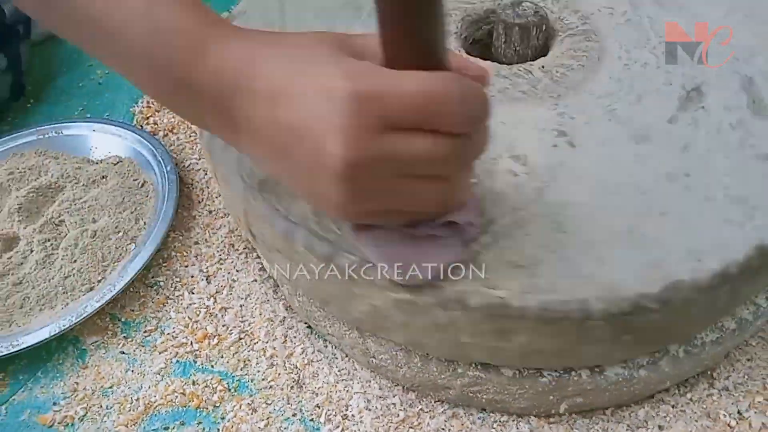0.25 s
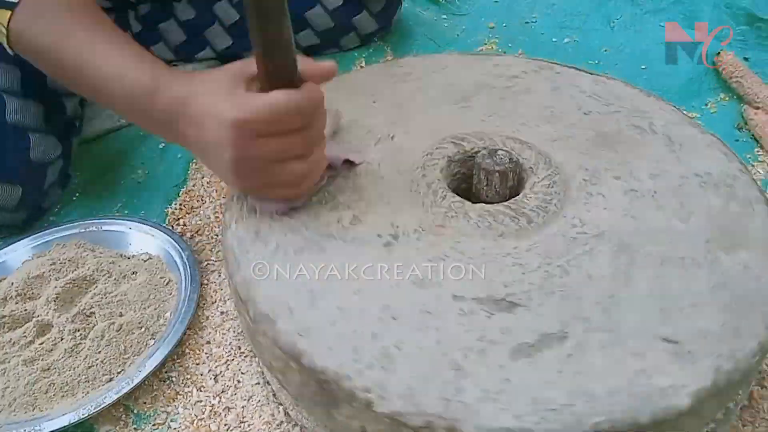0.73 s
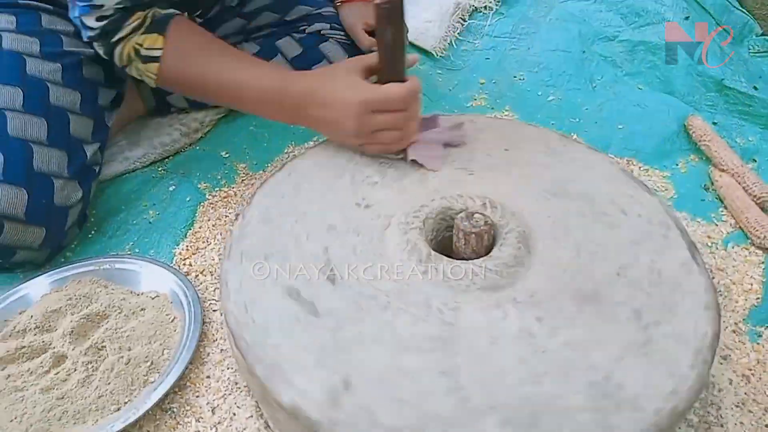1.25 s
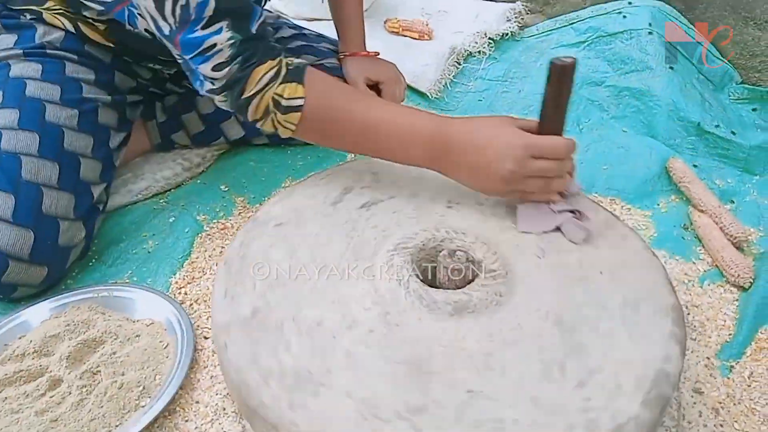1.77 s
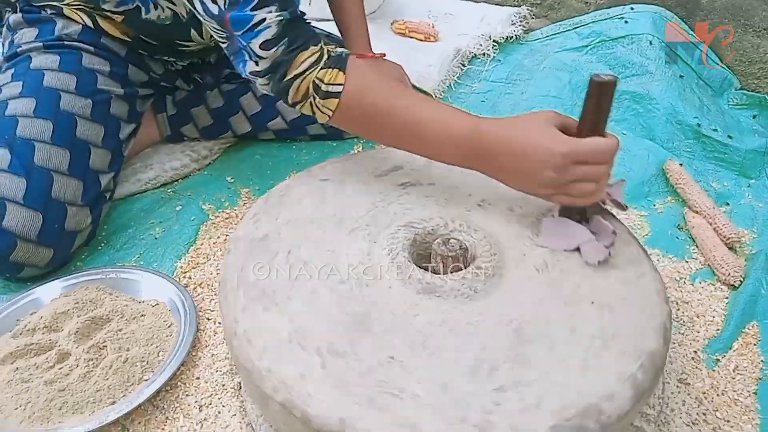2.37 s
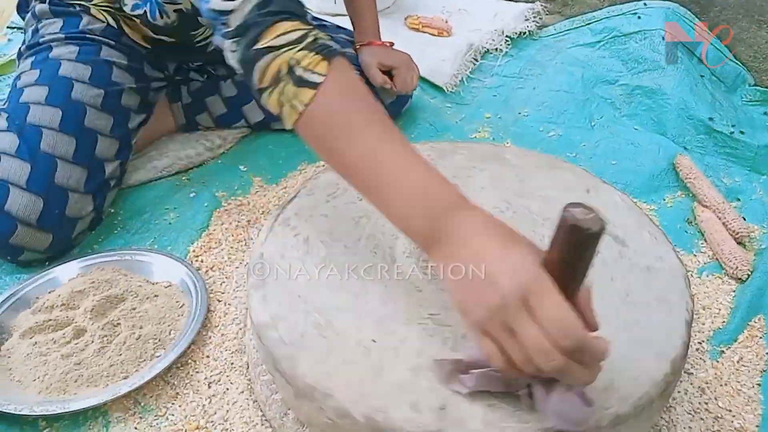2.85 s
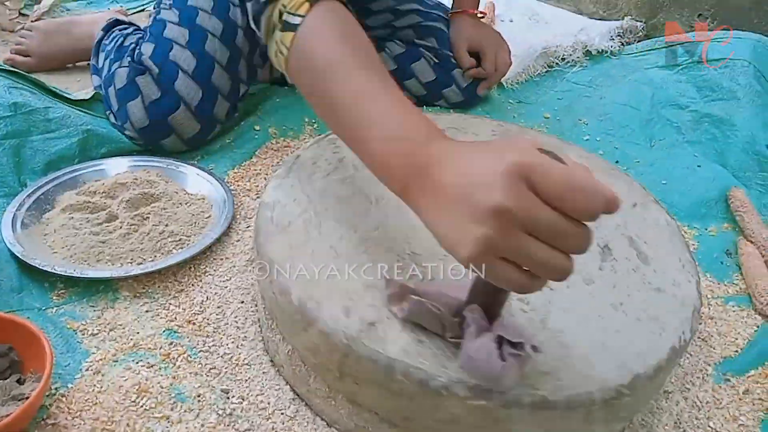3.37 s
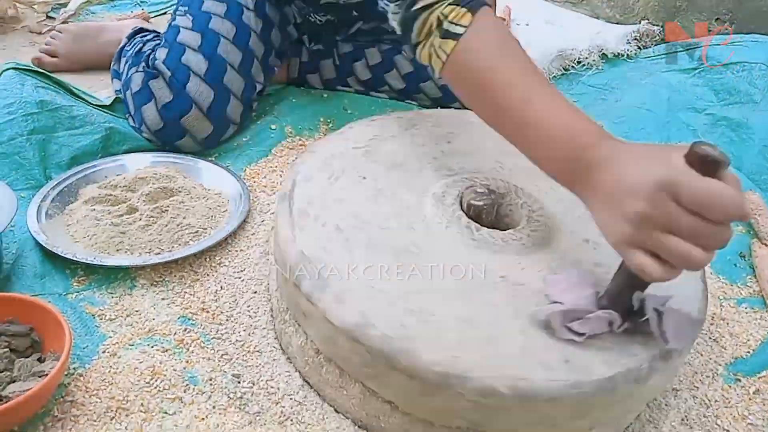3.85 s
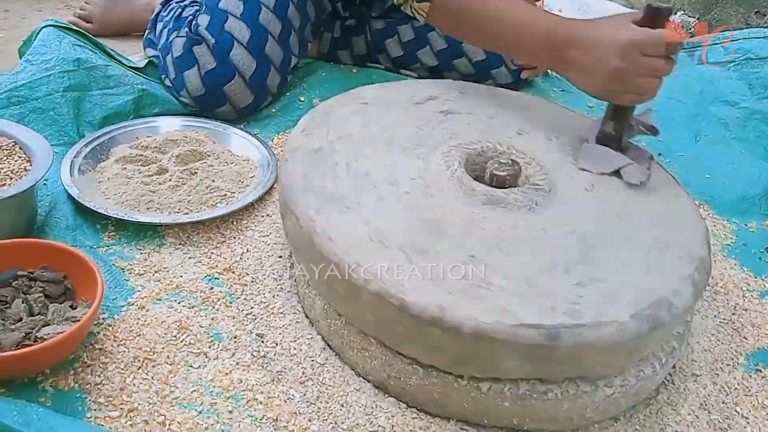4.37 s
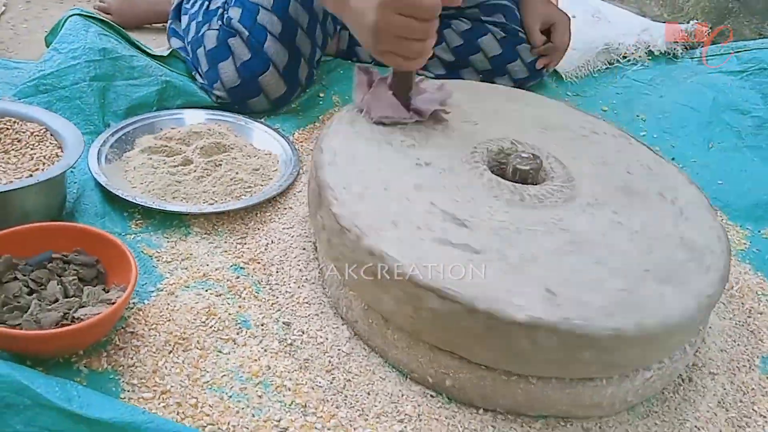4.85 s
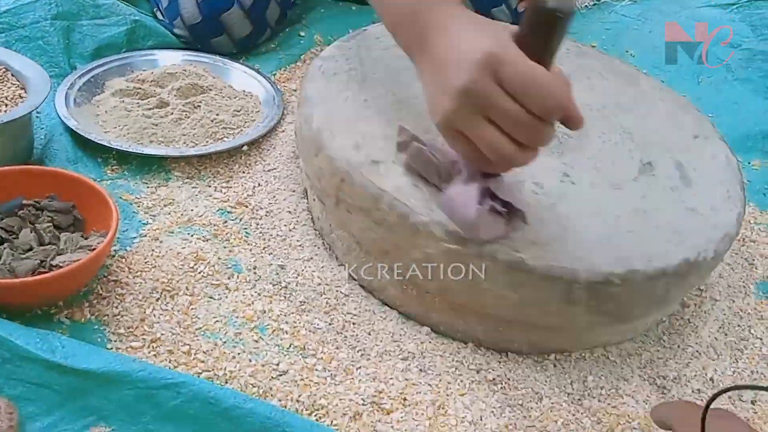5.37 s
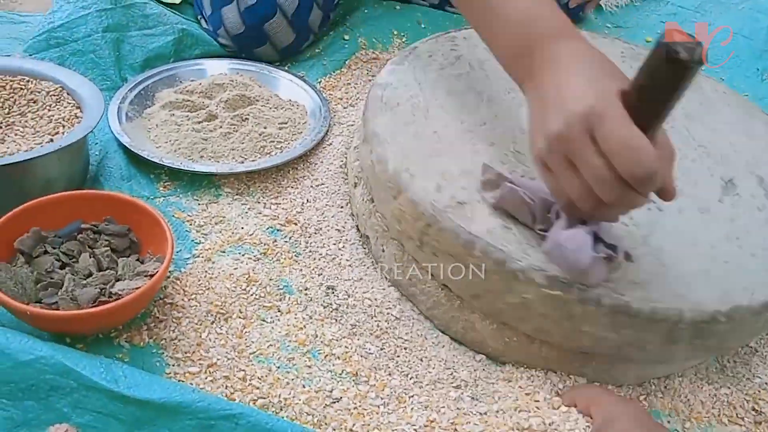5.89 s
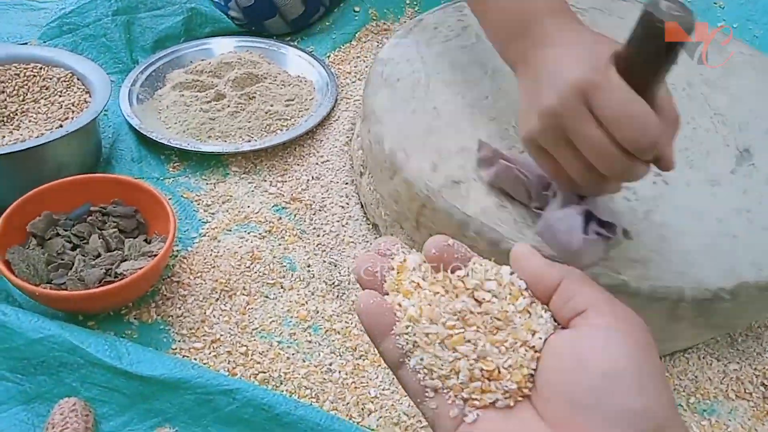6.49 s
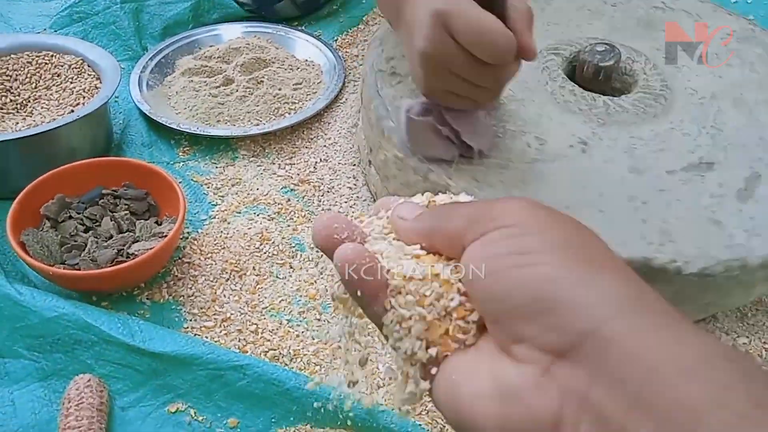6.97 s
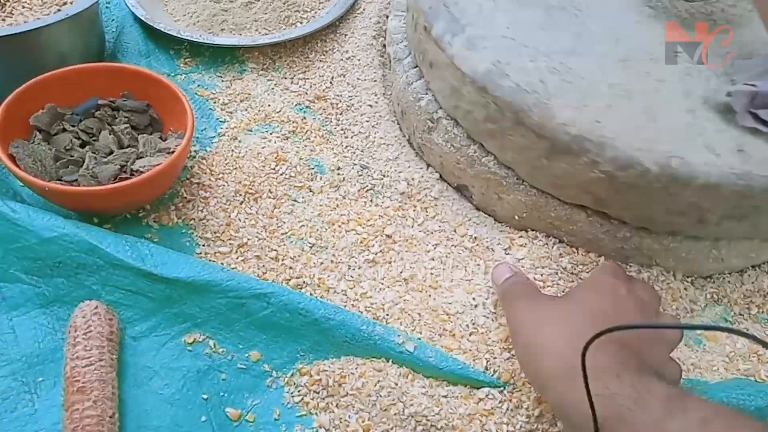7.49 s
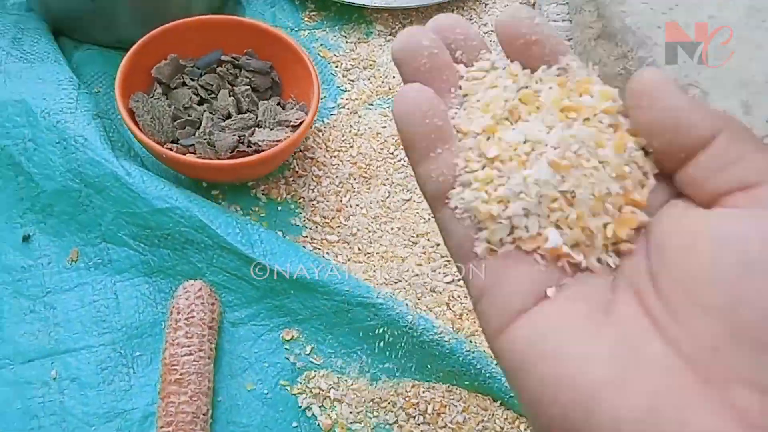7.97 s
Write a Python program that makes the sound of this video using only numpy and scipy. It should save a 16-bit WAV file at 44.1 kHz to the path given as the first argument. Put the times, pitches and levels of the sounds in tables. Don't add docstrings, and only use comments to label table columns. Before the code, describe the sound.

Outdoors, close to a small phone microphone with little deep bass, a heavy stone is already turning on its bed stone. From 0 to 3.1 s the grind is a dense, uneven rumble of cracking kernels with coarse scraping and a clear thin stony ring around 1.4 kHz, swelling and easing with each turn of about 0.7 s. Small jolts and faint dry husk crackles poke through. At 3.08 s the sound cuts to near silence, returning quickly by 3.28 s with a bright snap and knock. Now further off, the ring is weaker and low ground thuds are stronger. Jolts cluster from 3.4 to 4.2 s. Brief rubbing groans appear from 4.4 s, with small snaps around 5.3 to 5.6 s. From 5.8 s the grinding bears down harder, with lumps giving way around 6, 7.2 and 7.4 s, and more snaps, crackles and gritty hiss near 8 s; it is still grinding at the end.

```python
import sys
import numpy as np
from scipy import signal
from scipy.fft import rfft, irfft
from scipy.io import wavfile
from scipy.ndimage import uniform_filter1d, minimum_filter1d

SR = 44100
rng = np.random.default_rng(int(sys.argv[2]) if len(sys.argv) > 2 else 0)


def bounce(signal):
    frames = np.transpose(np.atleast_2d(signal))
    limited = np.clip(frames, -1, 1)
    pcm = np.round(limited * 32767).astype(np.int16)
    wavfile.write(sys.argv[1], SR, pcm)


def field_ratio(decibels):
    return 10 ** (np.asarray(decibels, dtype=float) / 20)


N = 363384

CUT_S = 3.0835
BASS_CUT_HZ, LIMIT = 46, 0.85
SOFT_HZ = 5360
BED_SPLIT_HZ = 640
RUB_WIDTH, RUB_ROUGH_DB = 0.2, 3.5
KNOCK_DB = 27

# (time [s], level [dB])
FADE_IN = [(3.084, -34), (3.091, -56), (3.1, -63), (3.125, -56), (3.18, -47), (3.22, -28), (3.25, -5.5),
           (3.272, -1.5), (3.29, 3.5)]
PLACE_DB = [
    -4,
    -8,
]

# (time [s], unevenness of the push [times the usual])
HANDLE_TURNS = [
    [(-0.141, 0.25), (0.21, 0.54), (0.908, 0.51), (1.543, 0.88), (2.11, 0.85), (2.865, 0.86), (3.601, 0.83)],
    [(2.652, 0.68), (4.095, 1.04), (5.035, 0.95), (5.894, 0.56), (6.668, 0.85), (7.423, 0.48), (8.04, 1.67),
     (9.38, 1.15)],
]
# (time [s], load on the stones [dB], seating of the runner [dB])
EFFORT = [(0, 0.5, 2.5), (0.75, 1.2, 0.7), (1.5, 0.93, -1.5), (2.2, -0.36, 1.1), (2.65, -0.7, 0.5),
          (3.08, -1, 1), (3.3, -7, 4), (3.7, -2, -0.5), (4.1, -1, -0.7), (4.35, 0.5, 2), (4.8, -0.5, 0.3),
          (5.2, 1.1, 2.1), (5.5, 1, -4.5), (5.8, 4, 4), (6.3, 2.5, 0.5), (6.9, 3.5, -4.0), (7.5, 3, -0.1),
          (8.24, 3.5, 0.4)]
# (level [dB], share of load [dB/dB],
# share of seating [dB/dB], once-a-turn swing [dB], its lag [turns], twice-a-turn swing [dB], its lag [turns])
NEAR_LAYERS = [
    (-20.5, 1.0, 0.49, 2, 0.39, 1.5, -0.075),
    (-23, 2.4, -0.32, 3.5, 0.42, 1.95, -0.16),
    (-31, 1.35, 0.59, 3, 0.351, 1.6, 0.055),
    (-18.5, 0.54, -0.3, 2.4, 0.36, 1.0, 0.023),
    (-34.5, 0.04, -0.19, 7.5, 0.22, 2.4, 0.022),
    (-36, 1.3, -1.1, 4, 0.23, -0.45, -0.22),
    (-56.5, 1.49, -0.31, 0.7, 0.31, 0.2, -0.028),
    (-71.0, 1.43, -0.07, 0, -0.412, 0.2, 0.062),
]
FAR_LAYERS = [
    (-19, 0.9, 0.11, 1.1, -0.22, 1.4, -0.028),
    (-23, 1.1, -0.34, 1.9, -0.048, 2.9, -0.036),
    (-24.4, 0.56, -0.16, 1.5, -0.41, 2.1, 0.016),
    (-24.5, 1.06, 0.05, 1.8, -0.0077, 0.26, 0.25),
    (-31.5, 0.5, 0.93, 1.3, 0.0, 3.2, -0.045),
    (-34, 0.82, 0.25, 2.7, -0.059, 1.7, -0.009),
    (-56, -0.49, 0.36, 1.8, 0.061, 1.4, -0.077),
    (-72, 1, -0.05, 0.9, 0.065, 0.9, -0.09),
]

# (time [s], extra force [times the steady grind])
JOLTS = [(0.271, 1.2), (.375, 0.44), (.615, 1.2), (1.08, 0.57), (1.145, 1.1), (1.167, 0.48), (1.226, 1),
         (1.717, 0.99), (2.297, 1.1), (3.393, 1.1), (3.5, 1.2), (3.604, 1), (3.701, 1.6), (3.851, 0.72),
         (4.023, 1.7), (4.144, 1.5), (4.819, 0.65), (5.305, .7), (5.494, 0.48), (5.547, 1), (5.96, 1.7),
         (6.181, 1.4), (6.528, 1), (6.854, 0.64), (7.0, 0.39), (7.206, 1.7), (7.319, 1.5), (7.432, 1.4),
         (7.619, 0.51), (7.95, 1)]
# (frequency [Hz], level [dB per Hz])
BED = [
    [(140, -43), (240, -20), (268, -5), (302, -7), (377, 0.5), (450, -6), (609, 0.5), (766, -2.5),
     (867, -4), (996, -15.5), (1150, -10), (1500, -45.5), (2530, -120)],
    [(140, -35.5), (240, -21.5), (281, -13.5), (344, -4.5), (411, -12), (494, -4.5), (601, 2), (663, -3.5),
     (823, -2.5), (932, -15), (1150, -10), (1500, -52.5), (2530, -120)],
]
# (frequency [Hz], level [dB per Hz])
THUD = [(25, -52), (45, -41.5), (78, -5), (120, 0.5), (147, 3.5), (180, 0), (260, -5), (340, -34),
        (570, -85)]

# (frequency [Hz], width [Hz], near level [dB], far level [dB])
FIRST_RING = [(1359.5, 17.5, 1.5, -1.5), (1378.2, 15.3, 0, -1)]
SECOND_RING = [(1985, 18, 0, -4), (2014, 28, -1, -3)]
UPPER_RINGS = [(3130, 240, -12, -8.5), (2915, 77, -2.5, -1.5), (2988, 51, -4.5, -2), (3120, 31, 5, 4.5),
               (3151, 26, -3, 1)]
THIN_RINGS = [(3910, 120, -10, -5), (4240, 100, -14, -8), (4410, 26, -1, 4.5), (4850, 69, -4, -8.5),
              (5090, 40, -4.5, -9), (5130, 24, -10, -6)]
# (frequency [Hz], level [dB per Hz])
SCRAPE = [
    [(900, -15), (1200, -16.5), (1600, -16.5), (1850, -3), (2300, -11), (2800, -12), (3500, -20.5),
     (4500, -30.5), (5200, -41.5), (5700, -46), (7000, -55), (9000, -74.5)],
    [(900, -13.5), (1200, 9.5), (1600, -20.5), (1850, -17.5), (2300, -13.5), (2800, -5), (3500, -9),
     (4500, -15), (5200, -24.5), (5700, -50.5), (7000, -57.5), (9000, -79)],
]
SCRAPE_DB = [
    -11.5,
    -13,
]

# (time [s], frequency [Hz], length [s], level [dB])
RUBS = [(4.42, 874, 0.11, -29), (5.044, 3370, 0.022, -38.5), (5.34, 3700, 0.044, -44),
        (5.4, 866, 0.074, -25.5), (5.569, 1375, 0.037, -25.5), (4.504, 270, 0.1, -32.5),
        (5.382, 270, .08, -31), (6.17, 603, 0.059, -21.5), (5.826, 699, 0.08, -22.5),
        (6.61, 598, 0.12, -22), (7.364, 623, .08, -22.5), (7.68, 910, 0.077, -28.5),
        (8.043, 640, .08, -25.5)]

# (frequency [Hz], level [dB per Hz])
GRIT = [(4500, -16), (5600, -10.5), (6300, 4), (7300, 2), (8200, -9.5), (9300, -20.5), (11000, -48)]
# (frequency [Hz], width [Hz], near level [dB], far level [dB])
GRIT_RINGS = [(6080, 90, 1, 4), (6600, 160, -7.5, -5.5), (7620, 39, 1, -3.5)]
# (frequency [Hz], level [dB per Hz])
DUST = [
    [(7000, -23), (8600, 1.5), (10500, -2.5), (11500, -1.5), (13300, 1), (15500, -2)],
    [(7000, -22.5), (9300, -4), (10500, -5), (11500, -2), (13300, 0.5), (15500, -1.5)],
]
# (time [s], level [dB])
COARSE = [(3.08, 0.5), (3.3, -5), (3.95, 1), (4.4, 1), (5.2, 2), (5.65, -0.5), (7.7, 1.5), (7.95, 2.5),
          (8.24, 0.5)]
COARSE_SHARE = [
    1.0,
    .6,
]

# (time [s], ping peak [dB], 12 kHz crack [dB], knock in the stone [dB])
SNAPS = [(3.278, -30, -43, -18.5), (3.614, -45, -66, -37), (4.34, -36, -56, -31),
         (5.3514, -36.5, -55.5, -33), (5.5034, -48, -65, -42), (5.6194, -48.5, -51.5, -33),
         (6.9163, -47, -59.5, -33), (7.0454, -40.5, -50.5, -46), (7.897, -32, -60, -24),
         (7.9698, -40.5, -58, -36), (8.0679, -41, -60, -40), (8.0961, -37.5, -65, -39)]
# (time [s], 12 kHz peak [dB], 7 kHz level [dB])
CRACKLES = [(0.21, -40, -39), (0.4397, -50, -52), (0.6728, -52, -60), (0.803, -49.5, -66),
            (0.893, -58, -43), (0.9692, -56, -48.5), (1.3456, -49.5, -53), (1.3717, -53.5, -53),
            (1.548, -51.5, -60), (1.7473, -48, -63), (1.783, -57, -50), (1.9953, -49.5, -50),
            (2.4098, -51, -65), (3.981, -49.5, -38), (4.0524, -50.5, -51), (4.368, -49.5, -48),
            (4.47, -51.5, -52), (5.052, -55, -52), (5.3258, -56, -44.5), (5.7757, -53.5, -49),
            (6.003, -49.5, -53), (6.318, -44, -51.5), (6.3788, -46.5, -57), (6.8718, -49.5, -55.5),
            (6.9041, -57, -56), (7.254, -52.5, -51), (7.606, -50, -47), (7.785, -56, -45),
            (7.952, -46, -49.5), (7.966, -51, -50)]


def grinding(place, layers_db):
    shudder = jolts() * field_ratio(1.1 * np.tanh(walk(18)) + 1.6 * np.tanh(walk(45)))
    rim = crushing(shudder)
    eye = crushing(shudder)
    times, extra = np.transpose(JOLTS)
    blows = clicks(times + 0.001, KNOCK_DB + 20 * np.log10(extra))
    lower = bed(rim + blows, eye, place, *layers_db[:2])
    upper = runner(rim, eye, place, *layers_db[2:5])
    return lower + upper + grit(shudder, place, *layers_db[5:])


def crushing(shudder):
    breaks = cracks(share=0.025, spread_db=3.0, most_db=14.5)
    return shudder * field_ratio(0.43 * walk(30)) * (breaks + 0.56 * rng.standard_normal(N))


def jolts():
    times, extra = np.transpose(JOLTS)
    at = np.zeros(N)
    at[(times * SR).astype(int)] = extra
    before = 800
    t = np.arange(-before, 2000) / SR
    stall = -0.33 * np.exp(np.minimum(t, 0) / 0.05)
    release = np.exp(-np.maximum(t, 0) / 0.0046)
    swells = signal.fftconvolve(at, np.where(t < 0, stall, release))[before:before + N]
    return np.maximum(1 + swells, 0.2)


def bed(rim, eye, place, upper_db, thud_db):
    rumble = np.choose(place, [colour(rim + 0.43 * eye, table) for table in BED])
    low, high = (steady(signal.sosfiltfilt(signal.butter(3, BED_SPLIT_HZ, kind, fs=SR, output="sos"), rumble))
                 for kind in ("low", "high"))
    thud = steady(colour((rim - 0.63 * eye) * field_ratio(3.1 * walk(10)), THUD))
    return low + field_ratio(0.91 * (upper_db + 2.5) - 5.5) * high + field_ratio(thud_db + 0.97) * thud


def runner(rim, eye, place, first_db, second_db, upper_db):
    push = soften(rim)
    scrape = np.choose(place, [steady(colour(eye, table)) for table in SCRAPE])
    scrape = scrape + field_ratio(-19.0) * stone(push, THIN_RINGS, place, wander_db=4.5)
    first = field_ratio(first_db + 2.06) * stone(push, FIRST_RING, place, wander_db=6.0)
    second = field_ratio(1.14 * (second_db + 16) - 14.5) * stone(push, SECOND_RING, place, wander_db=6.0)
    upper = field_ratio(upper_db + 1.27) * stone(push, UPPER_RINGS, place, wander_db=2.5)
    scrape_gain = field_ratio(np.choose(place, SCRAPE_DB) + 0.3 * (upper_db + 12))
    return first - second + upper + scrape_gain * scrape


def stone(force, modes, place, wander_db):
    total = np.zeros(N)
    for k, (hz, width, *db) in enumerate(modes):
        sign = (-1) ** (k // 2)
        drive = force * field_ratio(wander_db * walk(9))
        total += sign * field_ratio(np.choose(place, db)) * ring(drive, hz, width)
    return steady(total)


def turning(t, turns, layers):
    times, uneven = np.transpose(turns)
    turn = np.interp(t, times, np.arange(len(times)))
    uneven = np.interp(t, times, uneven)
    times, load_db, seat_db = np.transpose(EFFORT)
    load_db = np.interp(t, times, load_db)
    seat_db = np.interp(t, times, seat_db)
    levels_db = []
    for db, by_load, by_seat, once_db, once_lag, twice_db, twice_lag in layers:
        once = once_db * np.cos(2 * np.pi * (turn - once_lag))
        twice = twice_db * np.cos(4 * np.pi * (turn - twice_lag))
        levels_db.append(db + by_load * load_db + by_seat * seat_db + uneven * (once + twice))
    return np.array(levels_db)


def rubs():
    out = np.zeros(N)
    drag = field_ratio(RUB_ROUGH_DB * walk(40)) * rng.standard_normal(N)
    for time, hz, length, db in RUBS:
        at = np.arange(int((time - 0.4) * SR), min(int((time + 0.4) * SR), N))
        hum = ring(ring(drag[at], hz, RUB_WIDTH * hz), hz, RUB_WIDTH * hz)
        swell = np.exp(-0.5 * ((at / SR - time) / np.clip(length, 0.01, 0.13)) ** 2)
        out[at] += level(hum, db) * swell
    return out


def snaps():
    times, ping_db, crack_db, knock_db = np.transpose(SNAPS)
    blow = ring(bursts(times, ping_db, length_s=0.0029), 5900, 1800)
    ping = field_ratio(16) * ring(blow, 6200, 200) + field_ratio(-3.0) * blow
    crack = ring(bursts(times, crack_db - 1, length_s=0.002), 12500, 4500)
    knock = soften(ring(bursts(times, knock_db + 13, length_s=0.0036), 2300, 1400))
    return ping + crack + knock


def grit(shudder, place, grit_db, dust_db):
    breaks = cracks(share=0.0065, spread_db=2.0, most_db=14)
    fine = shudder * field_ratio(1.0 * walk(27)) * (breaks + 1.2 * rng.standard_normal(N))
    hiss = steady(colour(fine, GRIT)) + field_ratio(-8.0) * stone(fine, GRIT_RINGS, place, wander_db=8.5)
    rustle = fine + 1.2 * field_ratio(1.6 * walk(20)) * rng.standard_normal(N)
    dust = np.choose(place, [steady(colour(rustle, table)) for table in DUST])
    return field_ratio(grit_db - 0.3) * hiss + field_ratio(dust_db + 5.0) * dust


def crackles():
    times, top_db, mid_db = np.transpose(CRACKLES)
    top = ring(bursts(times, top_db + 2.5, length_s=0.00097), 12500, 5000)
    mid = ring(bursts(times, mid_db + 9.5, length_s=0.0011), 6700, 2600)
    return top + ring(mid, 6700, 2600)


def cracks(share, spread_db, most_db):
    hit, size, sign = rng.random((3, N))
    size_db = np.minimum(-spread_db * np.log(size + 1e-9), most_db)
    return level((hit < share) * field_ratio(size_db) * np.sign(sign - 0.5))


def clicks(times, db):
    out = np.zeros(N)
    out[(np.asarray(times) * SR).astype(int)] = field_ratio(db)
    return out


def bursts(times, db, length_s):
    t = np.arange(int(5 * length_s * SR)) / SR
    shape = signal.fftconvolve(clicks(times, db), np.exp(-t / length_s))[:N]
    return shape * rng.standard_normal(N)


def ring(x, hz, width):
    pole = np.exp((2j * np.pi * hz - np.pi * width) / SR)
    return signal.lfilter([2 * (1 - abs(pole))], [1, -pole], x).imag


def soften(x):
    return signal.sosfilt(signal.butter(4, SOFT_HZ, fs=SR, output="sos"), x)


def steady(x):
    k = int(0.13 * SR)
    return x / np.sqrt(uniform_filter1d(uniform_filter1d(x ** 2, k), k))


def walk(rate):
    k = int(SR / rate)
    held = np.repeat(rng.standard_normal(N // k + 1), k)
    slow = uniform_filter1d(uniform_filter1d(held, k), k)[:N]
    return slow / slow.std()


def colour(x, table):
    hz, db = np.transpose(table)
    size = 2 ** 13
    log_hz = np.log(np.arange(size // 2 + 1) * SR / size + 1)
    ceps = irfft(np.log(field_ratio(np.interp(log_hz, np.log(hz), db))))
    ceps[1:size // 2] *= 2
    ceps[size // 2 + 1:] = 0
    return signal.fftconvolve(x, irfft(np.exp(rfft(ceps))))[:N]


def level(x, db=0):
    return x * field_ratio(db) / np.sqrt(np.mean(x ** 2))


def scene():
    t = np.arange(N) / SR
    place = (t > CUT_S).astype(int)
    near_db = turning(t, HANDLE_TURNS[0], NEAR_LAYERS)
    far_db = turning(t, HANDLE_TURNS[1], FAR_LAYERS)
    levels_db = np.where(place, far_db, near_db)
    levels_db[-2:] += np.outer(COARSE_SHARE, np.interp(t, *np.transpose(COARSE)))
    rumble_db = levels_db[0]
    mill = field_ratio(rumble_db + np.choose(place, PLACE_DB)) * grinding(place, levels_db[1:] - rumble_db)
    return (mill + rubs() + snaps() + crackles())[None]


def band_limit(x):
    return signal.sosfilt(signal.butter(12, 15500, fs=SR, output="sos"), x)


def record(dry):
    t = np.arange(N) / SR
    fade_db = (t > CUT_S) * np.interp(t, *np.transpose(FADE_IN))
    gate = uniform_filter1d(field_ratio(fade_db), size=12)
    heard = gate * signal.sosfilt(signal.butter(4, BASS_CUT_HZ, "high", fs=SR, output="sos"), dry)
    k = int(0.006 * SR)
    needed = LIMIT / np.maximum(abs(heard), LIMIT)
    gain = uniform_filter1d(minimum_filter1d(needed, 2 * k), k)
    return band_limit(heard * gain)


dry = scene()
out = record(dry)
bounce(out)
```